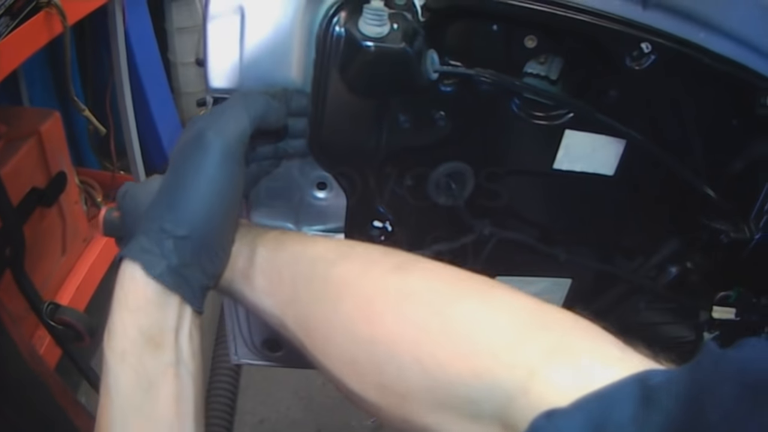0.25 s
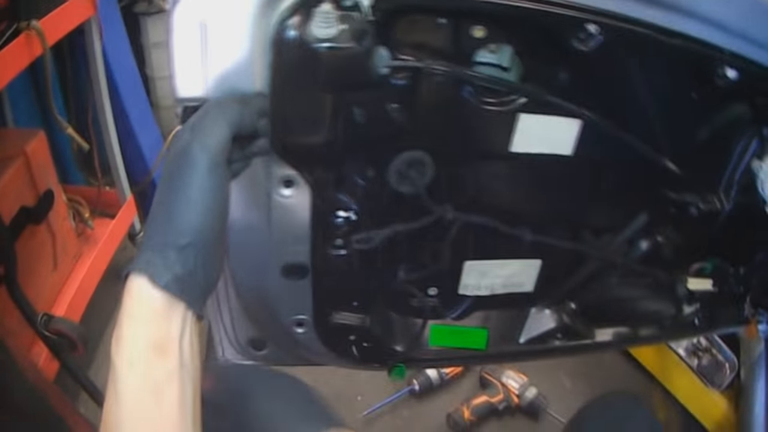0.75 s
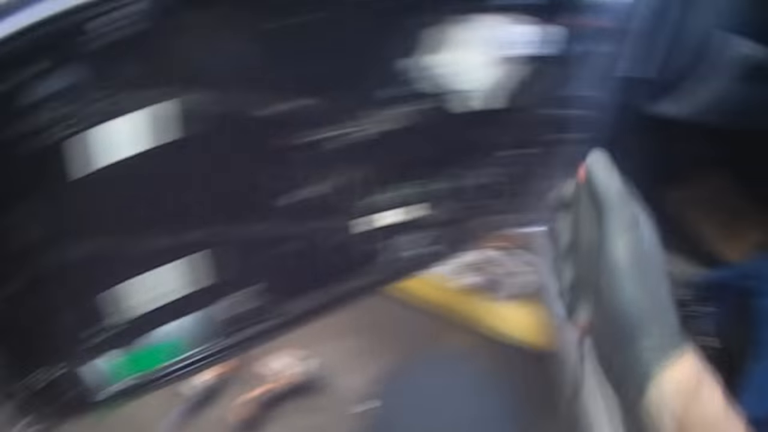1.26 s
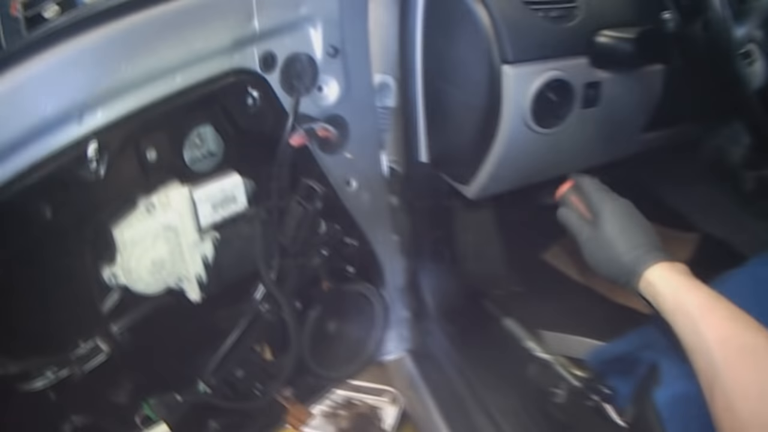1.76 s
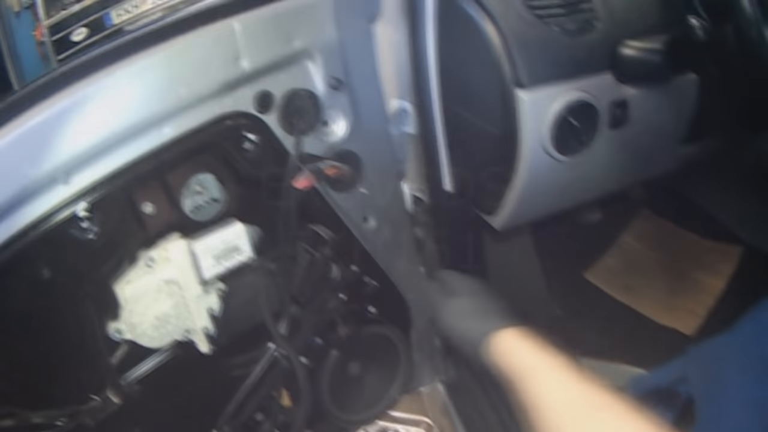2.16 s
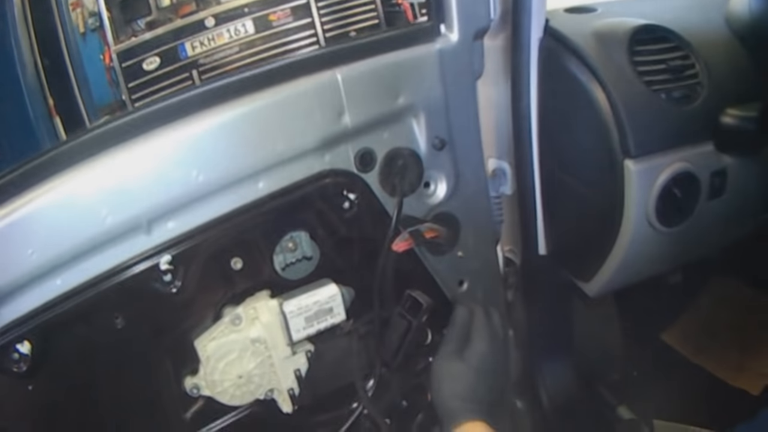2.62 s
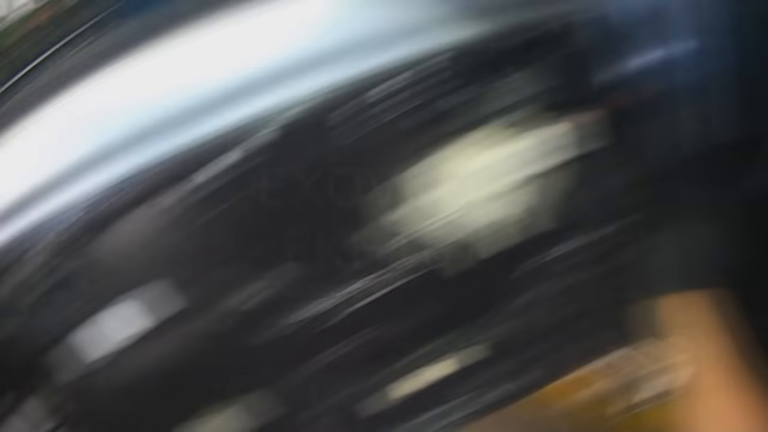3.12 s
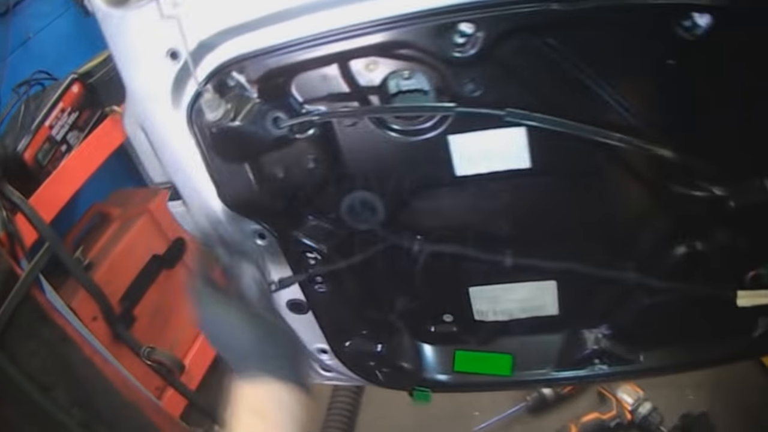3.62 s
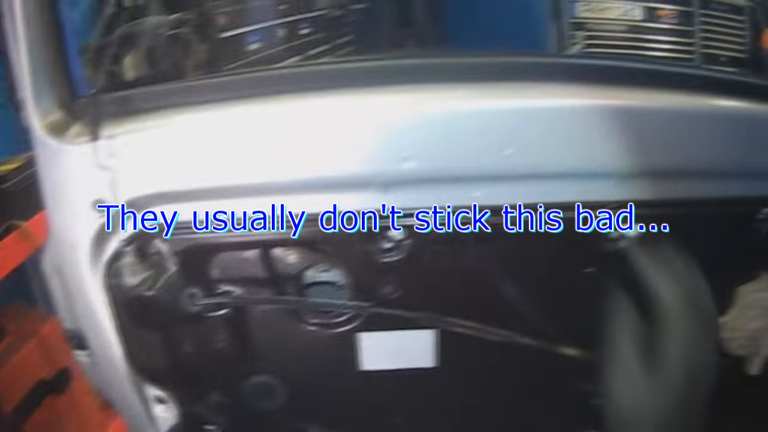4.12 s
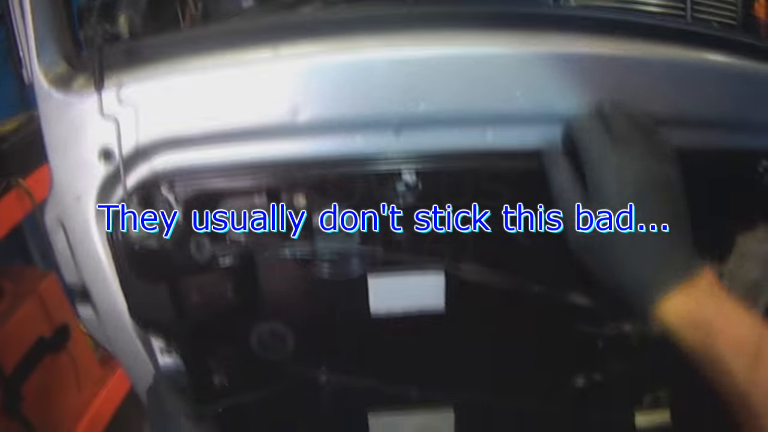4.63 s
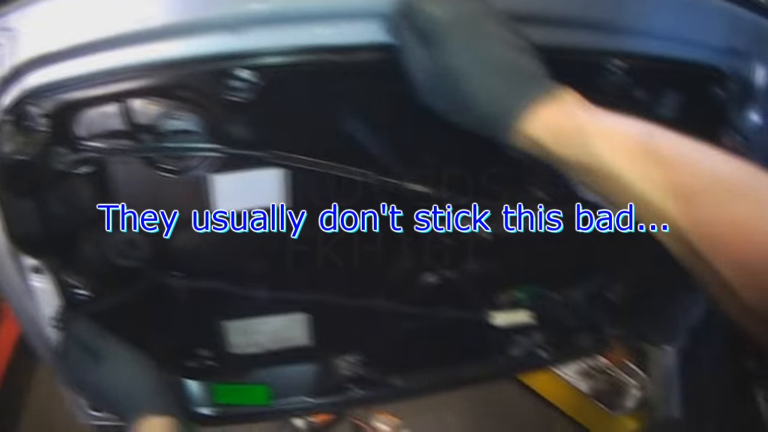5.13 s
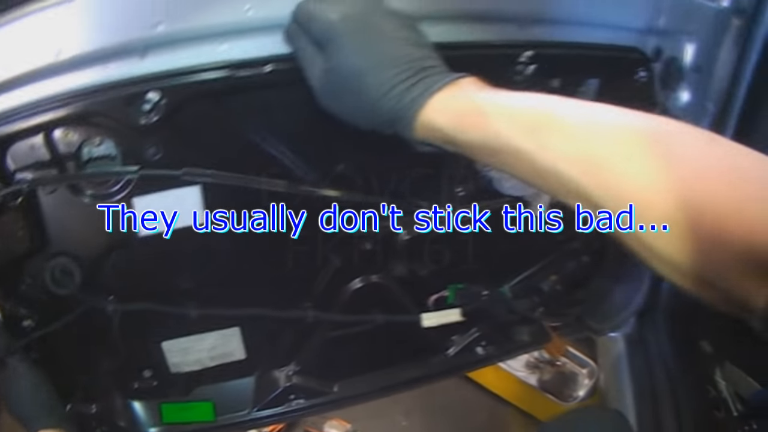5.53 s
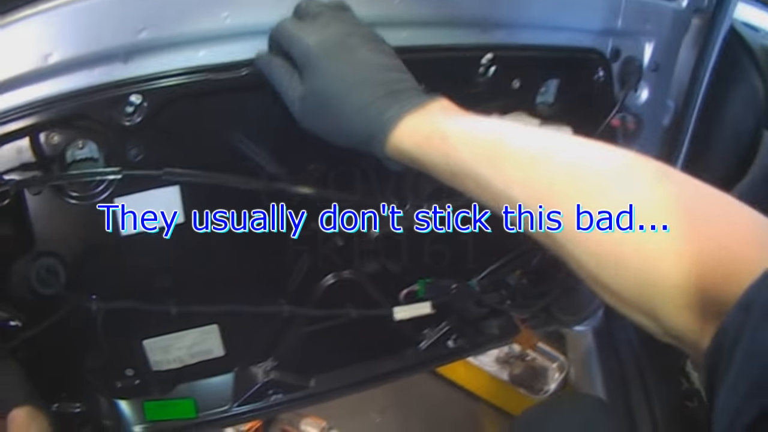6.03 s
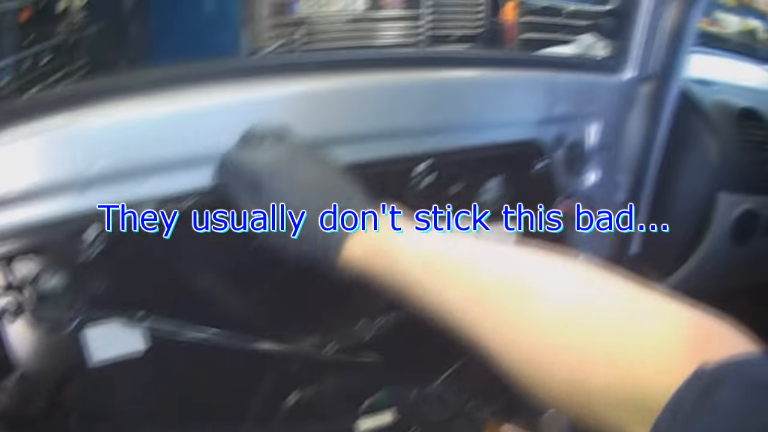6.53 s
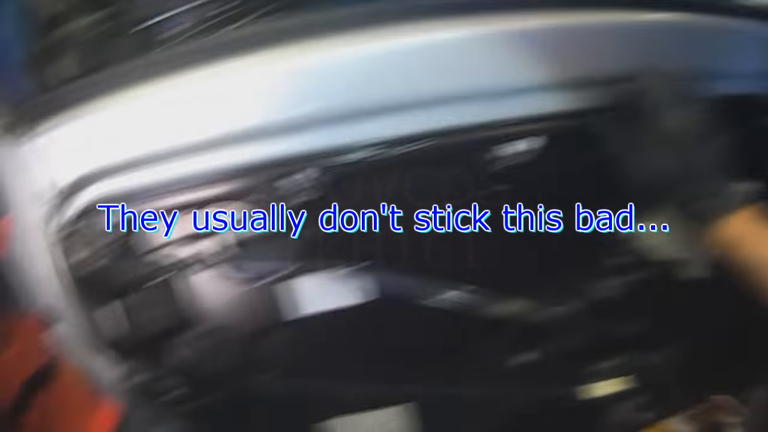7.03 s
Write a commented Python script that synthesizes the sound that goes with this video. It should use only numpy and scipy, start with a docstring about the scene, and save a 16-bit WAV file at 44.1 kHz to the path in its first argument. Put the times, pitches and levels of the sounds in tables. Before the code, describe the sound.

A quiet engine idle runs throughout: a wavering low hum with a fast throbbing roar, thin hiss, very faint whines and low camera rumble. A tiny tick opens; a soft dull panel knock falls at 0.55 s and a faint tick at 0.85. At 2.1 a barely audible glove rub leads to a sharp, loud fastener crack at 2.23 with a short low boom, then smaller knocks at 2.35 and a tiny high squeak at 2.42. A soft low thump comes at 3.67, light ticks around 3.8 and 4.17, glove strokes at 4.55-4.7. Two short mid-pitched squeaks sound at 5.12-5.2, a knock at 5.29. At 6.18 a brief squeak bursts into the loudest event: ripping sealant, crowded metallic blows and a deep boom, peaking near 6.24, with a second lesser surge at 6.29. Rattles at 6.4, a small metal clink at 6.48, a weak knock at 6.54 and a crisp tick at 6.76 follow; then only the idle until 7.27.

```python
"""Door panel worked off by hand

A stuck sheet-metal panel is worked off a car door, close to a head-worn camera in a workshop with an idling engine.
Damped sines ring the panel, fastener, small part and bracket; filtered noise gives their contacts and cracks.
The seal squeaks in short tones, then tears in surges of tiny cracks and blows that jolt the panel.
A glove rubs in strokes of noise; the engine is a wavering hum plus a throbbing roar; sparse echoes give the room.
"""
import sys
import numpy as np
from scipy import signal
from scipy.fft import rfft, irfft
from scipy.io import wavfile

SR = 44100
rng = np.random.default_rng(int(sys.argv[2]) if len(sys.argv) > 2 else 0)


def log_audio(samples):
    """Write samples as a 16-bit WAV file to the path given in sys.argv[1]."""
    # one column per channel
    frames = np.atleast_2d(samples).T
    # limit to full scale, then quantise
    limited = np.clip(frames, -1, 1)
    pcm = np.round(limited * 32767).astype(np.int16)
    wavfile.write(sys.argv[1], SR, pcm)


N = 320607


def amp(db):
    """Decibels to gain."""
    return 10 ** (np.asarray(db) / 20)


def evened(x):
    """Scales to an rms of 1."""
    return x / np.sqrt(np.mean(x ** 2) + 1e-20)


def read(points, hz):
    """Reads a spectrum or decay curve on a log-frequency axis."""
    point_hz, value = np.transpose(points)
    return np.interp(np.log(hz + 1), np.log(point_hz + 1), value)


def follow(curve):
    """Reads a time curve at every sample."""
    return np.interp(np.arange(N) / SR, *np.transpose(curve))


def add(mix, start_s, sound):
    """Mixes a sound in at start_s."""
    part = mix[max(round(start_s * SR), 0):][:len(sound)]
    part += sound[:len(part)]


def noise(points, size=N):
    """Noise of rms 1 with the given spectrum."""
    gain = amp(read(points, np.fft.rfftfreq(size, 1 / SR)))
    return evened(irfft(rfft(rng.standard_normal(size)) * gain, size))


def drift(hz):
    """Slow random motion of rms 1, no faster than about hz."""
    knots = rng.standard_normal(4096)
    return evened(np.interp(np.arange(N) / SR * 2 * hz, np.arange(len(knots)), knots))


def colour(x, points, size=4096):
    """Passes x through a causal (minimum-phase) filter of unit energy with the given spectrum."""
    log_gain = np.log(amp(read(points, abs(np.fft.fftfreq(size, 1 / SR)))))
    taps = np.fft.ifft(np.exp(np.conj(signal.hilbert(log_gain)))).real[:size // 2]
    return signal.oaconvolve(x, taps / np.linalg.norm(taps))[:len(x)]


def shelve(x, bass_db, treble_db, bass_hz=400, treble_hz=1900):
    """Lifts or lowers bass and treble with first-order causal filters."""
    x = x + (amp(bass_db) - 1) * signal.lfilter(*signal.butter(1, bass_hz, fs=SR), x)
    return x + (amp(treble_db) - 1) * signal.lfilter(*signal.butter(1, treble_hz, "high", fs=SR), x)


def ring(modes, t, rise_s):
    """Dying sines that build up as the flexing spreads through the part."""
    modal = sum(amp(db - 60 * t / t60_s) * np.sin(2 * np.pi * hz * t) for hz, db, t60_s in modes)
    return modal * (1 - np.exp(-t / rise_s))


IDLE_HZ = 26.56  # firings per second
# hum lines: multiple_of_idle, relative_db
HUM = [(3, -3.5), (4, -9.5), (6, -3), (8, -12.5), (9, -6.5), (10, -12.5), (11, -17), (12, -15), (14, -7),
       (16, -13.5), (19, -8), (23, -13), (25, -8)]
# the two clearest hum lines: multiple_of_idle, relative_db
CLEAR_HUM = [(7, -3.5), (21, -6)]
# gain of the clear lines as the head turns: time_s, relative_db
CLEAR_HUM_DB = [(0, 7.5), (0.9, 4.5), (1.5, 1), (3.1, -5.5), (3.7, 5.5), (4.9, 3), (5.7, -2.5), (7.27, 2.5)]
# roar spectrum: frequency_hz, relative_db_per_hz
ROAR = [(40, -3.5), (70, -3), (130, 1), (220, -2.5), (380, -2), (530, -0.5), (650, 0), (860, -5),
        (1180, -7.5), (1500, -17.5), (2000, -28), (3000, -64)]
# roar gain as the head turns: time_s, relative_db
ROAR_DB = [(0, -35), (0.6, -34.5), (2.9, -37.5), (4.4, -36), (6.1, -34), (7.27, -35.5)]


def hum_lines(lines, turns, waver):
    """Sums multiples of the firing rate, each wavering in level on its own."""
    total = 0
    for multiple, db in lines:
        line_gain = amp(db) * (1 + waver * drift(hz=2.5))
        total = total + line_gain * np.cos(2 * np.pi * (round(multiple) * turns + rng.random()))
    return total


def engine(hum_db=-41, roar_db=1.0, throb=0.32, waver=0.34):
    """A wavering hum on multiples of the firing rate, and a roar that throbs with each firing."""
    turns = np.cumsum(IDLE_HZ * (1 + 0.0022 * drift(hz=3))) / SR
    hum = hum_lines(HUM, turns, waver)
    clear = hum_lines(CLEAR_HUM, turns, waver) * amp(follow(CLEAR_HUM_DB))
    puffs = evened(1 + throb * np.exp(-(turns % 1) / 2.0)) * rng.standard_normal(N)
    roar = colour(puffs, ROAR) * amp(roar_db + follow(ROAR_DB) + 0.5 * drift(hz=6.5))
    return amp(hum_db) * (hum + clear) + roar


# hiss spectrum: frequency_hz, relative_db_per_hz
HISS = [(1000, 0), (1900, 2.5), (2400, 2), (3100, -1.5), (4100, -5.5), (4900, -12), (6100, -10),
        (7000, -16), (8000, -14.5), (9300, -20), (11000, -25), (12200, -40), (14300, -46), (15300, -45)]
# rumble spectrum: frequency_hz, relative_db_per_hz
RUMBLE = [(1, 14), (6, 14.5), (12, 11.5), (28, 3), (55, -4), (110, -18), (300, -62.5)]
# faint whines in the shop: pitch_hz, level_db
WHINES = [(3171, -71), (9561, -82)]


def air(hiss_db=-58, rumble_db=-30.0, flutter_db=2.0):
    """Steady hiss, thin whines fluttering in pitch and level, and the low rumble of the moving camera."""
    whines = 0
    for hz, db in WHINES:
        gain = amp(db + flutter_db * drift(hz=16))
        cycles = np.cumsum(hz * (1 + 0.007 * drift(hz=119))) / SR
        whines = whines + gain * np.sin(2 * np.pi * cycles)
    hiss = amp(hiss_db + 0.5 * drift(hz=8.8)) * noise(HISS)
    return hiss + whines + amp(rumble_db) * noise(RUMBLE)


# light ticks: start_s, level_db, treble_db, ring_db
TICKS = [(0.017, -40.5, -13.5, -9), (0.854, -47.5, 5.5, -16), (2.441, -48, -8, -9), (3.792, -41.5, -8, -6),
         (3.818, -46, -2, -6), (4.168, -45, 3, -9), (6.162, -49, -12, -12), (6.763, -30, 7, -9)]
# contact spectrum: frequency_hz, relative_db_per_hz
TICK_COLOUR = [(700, -2), (1700, 3.5), (2300, 6), (3400, 4.5), (4800, -7), (7000, -17), (9500, -19),
               (12500, -29), (15000, -41)]
# small loose part's modes: pitch_hz, relative_db, t60_s
PART = [(1950, -7, .08), (2400, 5.5, 0.07), (2890, -4, 0.058), (3090, -0.5, .09), (3470, -5, 0.068),
        (4050, -9, .09), (4890, -11, .08)]
TICK_T60_S, SETTLE_S, SETTLE_DB = 0.064, 0.022, -11


def ticks(direct_db=-1, rise_s=0.001, size=12288):
    """A brief contact chatter and a softer second touch; the first leaves the small part ringing."""
    chatter, body, t = np.zeros(N), np.zeros(N), np.arange(size) / SR
    touch = (1 - np.exp(-t / rise_s)) * amp(-60 * t / TICK_T60_S)
    for start_s, db, treble_db, ring_db in TICKS:
        add(body, start_s, amp(db + ring_db) * ring(PART, t, rise_s))
        for delay_s, touch_db in ((0, 0), (SETTLE_S, SETTLE_DB)):
            burst = rng.standard_normal(size) * touch * amp(db + touch_db)
            add(chatter, start_s + delay_s, shelve(burst, 0, treble_db, treble_hz=7000))
    return amp(direct_db) * colour(chatter, TICK_COLOUR) + body


# knocks on the panel, and a faint bright click just before the fastener lets go: start_s, level_db, bass_db,
# treble_db, rattle_t60_s
BLOWS = [(0.551, -33, 11.5, -4, 0.084), (2.2026, -33.5, -23, 14, 0.021), (2.2337, -22, -3, 1, 0.08),
         (2.349, -23.5, 3, -12, 0.027), (2.360, -23.5, -6, -2, 0.11), (5.2915, -24.5, 2.5, -17, 0.046),
         (5.329, -34, 7.5, -14, 0.017), (6.193, -13.5, -6, -12, .04), (6.199, -21, -7, -6, 0.033),
         (6.2135, -12, 4, -12, 0.032), (6.220, -12.5, 3, 2, .04), (6.2305, -13.5, 4, 3, 0.014),
         (6.236, -10, 1, 0, 0.028), (6.2445, -8, -4, -2, 0.091), (6.253, -13.5, -1, -8, 0.035),
         (6.288, -15, 2, -6, .02), (6.295, -21, -4, -4, .04), (6.305, -21.5, 6.5, -3, .04),
         (6.400, -23.5, 2.5, -2, .14), (6.4765, -33, -17, 16.5, 0.12), (6.543, -29, -18, -7, 0.07)]
RATTLE_GAP_S, RATTLE_JITTER = 0.005, 0.324  # jitter in gaps


def rattles(count=4):
    """Each knock and its dying, unevenly spaced touches: start_s, level_db, bass_db, treble_db."""
    touches = []
    for start_s, db, bass_db, treble_db, t60_s in BLOWS:
        jitter = RATTLE_JITTER * rng.uniform(-1.007, 1, count)
        times_s = RATTLE_GAP_S * (np.arange(count) + 1 + jitter)
        touches += [(start_s + t, db - 60 * t / t60_s, bass_db, treble_db) for t in [0, *times_s]]
    return touches


# sheet modes: pitch_hz, relative_db, t60_s
PANEL = [(214, -4.5, 0.042), (237, -10, 0.19), (308, -3.5, 0.084), (423, -2.5, 0.068), (526, -8, 0.096),
         (636, 2, 0.12), (740, -3.5, 0.11), (832, -9, 0.11), (970, -1.5, 0.025), (1002, 2, 0.046),
         (1157, -17, 0.084), (1358, -13, 0.087), (1602, -15.5, 0.12)]
# dense crunch of a blow: frequency_hz, relative_db_per_hz
CRUNCH = [(60, -33), (180, 2.5), (500, 2), (1100, -1.5), (1500, -10.5), (2000, -23), (3000, -22.5),
          (4200, -36), (6500, -43.5), (10000, -48), (15000, -66)]


def panel(crunch_t60_s=0.051, contact_t60_s=0.0083, modes_db=-8, crunch_db=-8, contact_db=1,
          spread_s=0.00093, spot_db=1.5, size=16384):
    """Each touch and slip rings the sheet in a spot-dependent mix, over a hard contact and a short crunch."""
    out, t = np.zeros(N), np.arange(size) / SR
    modes = np.array([ring([mode], t, spread_s) for mode in PANEL])
    contact = amp(crunch_db - 60 * t / crunch_t60_s) + amp(contact_db - 60 * t / contact_t60_s)
    for start_s, db, bass_db, treble_db in rattles() + slips():
        force = rng.choice([-1, 1], size) * contact
        body = amp(modes_db + spot_db * rng.standard_normal(len(modes))) @ modes
        add(out, start_s, amp(db) * shelve(body + colour(force, CRUNCH), bass_db, treble_db))
    return out


# glove sliding on paint: start_s, length_s, relative_db, treble_db
RUBS = [(2.089, 0.1, -62.5, 13), (4.554, 0.052, -44, -7), (4.593, 0.13, -42.5, -7.5)]
# friction spectrum: frequency_hz, relative_db_per_hz
RUB_COLOUR = [(500, -4), (1500, 12), (3000, 3.5), (5300, -4.5), (7000, -16), (11000, -20), (15000, -35)]


def glove(size=16384):
    """Soft strokes of friction noise, uneven in level."""
    out = np.zeros(N)
    for start_s, length_s, db, treble_db in RUBS:
        stroke = signal.windows.tukey(int(length_s * SR), 0.7)[:size]
        friction = shelve(noise(RUB_COLOUR, size), 0, treble_db)[:len(stroke)]
        add(out, start_s, amp(db) * friction * stroke)
    return out * amp(-4 + drift(hz=77.0))


# fastener lets go in two jerks: start_s, level_db
SNAPS = [(2.2307, -5.5), (2.2343, -20.5)]
# modes of the stiff spot round it: pitch_hz, relative_db, t60_s
FASTENER = [(708, 4.5, 0.046), (950, 3.5, 0.026), (1340, -16, 0.033), (1620, -6.5, 0.038),
            (2620, -14.5, 0.029), (3260, -24, 0.03), (5150, -20, 0.022)]
# crack spectrum: frequency_hz, relative_db_per_hz
CRACK = [(700, 9.5), (1700, 3.5), (3000, -3.5), (4300, -8), (5200, -15), (6500, -17.5), (9500, -24),
         (12500, -37), (15000, -38)]


def fastener(crack_db=-20, crack_t60_s=0.05, ring_wet_db=-27, crack_wet_db=-14.5,
             scatter_db=-28, scatter_t60_s=0.075, scatter_per_s=500):
    """Two jerks ring the stiff spot; a crack and scattered chatter start with the first; both echo."""
    body, crack, t = np.zeros(N), np.zeros(N), np.arange(SR // 4) / SR
    for start_s, db in SNAPS:
        add(body, start_s, -amp(db) * ring(FASTENER, t, rise_s=0.0019))
    burst = rng.standard_normal(len(t)) * amp(crack_db - 60 * t / crack_t60_s)
    clicks = rng.choice([-1, 1], len(t)) * (rng.random(len(t)) < scatter_per_s / SR)
    scatter = evened(clicks) * amp(scatter_db - 60 * t / scatter_t60_s)
    add(crack, SNAPS[0][0], colour(burst + scatter, CRACK))
    return body + crack + shop(amp(ring_wet_db) * body + amp(crack_wet_db) * crack)


# whole sheet springs back: start_s, level_db, pitch_hz, t60_s
BOOMS = [(2.231, -15, 110, 0.12), (3.674, -19.5, 105.7, 0.2), (6.212, -6, 99.8, 0.28)]


def booms(rise_s=0.02):
    """The lowest mode of the sheet swells over a few cycles while dying away."""
    out, t = np.zeros(N), np.arange(SR // 2) / SR
    for start_s, db, hz, t60_s in BOOMS:
        add(out, start_s, ring([(hz, db, t60_s)], t, rise_s))
    return out


# stick-slip of the seal: start_s, length_s, pitch_hz, level_db
SQUEAKS = [(2.422, 0.019, 1225, -27), (5.117, 0.033, 632, -24), (5.161, 0.043, 632, -24),
           (6.176, 0.0092, 1120, -22)]


def squeaks(overtone_db=-33):
    """The seal slips in short, near-pure tones."""
    out = np.zeros(N)
    for start_s, length_s, hz, db in SQUEAKS:
        phase = 2 * np.pi * hz * np.arange(int(length_s * SR)) / SR
        tone = np.sin(phase) + amp(overtone_db) * np.sin(2 * phase)
        add(out, start_s, amp(db) * signal.windows.tukey(len(phase), 0.5) * tone)
    return out


SWELL_POWER, RELEASE_T60_S = 0.34, 0.16


def pull(t, swell_s):
    """Force on the seal, 0-1, t seconds into a surge: grows as a power of time, then dies away."""
    release = amp(-60 * np.maximum(t - swell_s, 0) / RELEASE_T60_S)
    return np.clip(t / swell_s, 0, 1) ** SWELL_POWER * release


# surges of the tearing seal: start_s, swell_s, relative_db
TEARS = [(6.177, 0.066, -11), (6.2865, 0.0033, -15.5)]
SLIP_GAP_S, SLIP_JITTER = 0.0055, 0.353  # jitter in gaps
SLIP_DB, SLIP_BASS_DB, SLIP_TREBLE_DB = -6.5, 9, -8


def slips(count=32):
    """Seal slips jolt the panel, as hard as the pull: start_s, level_db, bass_db, treble_db."""
    blows = []
    for start_s, swell_s, db in TEARS:
        early = rng.uniform(-0.98, 1, count)
        times_s = SLIP_GAP_S * (np.arange(count) + 0.5 + SLIP_JITTER * early)
        levels_db = SLIP_DB + db + 20 * np.log10(pull(times_s, swell_s) + 1e-9)
        blows += [(start_s + t, level_db, SLIP_BASS_DB, SLIP_TREBLE_DB)
                  for t, level_db in zip(times_s, levels_db)]
    return blows


# sticky seal ripping: frequency_hz, relative_db_per_hz
RIP_COLOUR = [(500, 2), (1400, 8.5), (2100, 6), (3100, 4), (4200, -8), (7000, -19.5), (10000, -27),
              (15000, -41)]


def rip(per_s=1400, spread_db=1.5, rip_db=-10.5, steepness=1.86):
    """Strands of sealant part as a dense run of tiny cracks whose level follows a power of the pull."""
    sizes = amp(spread_db * np.minimum(rng.exponential(1, N), 3))
    cracks = (rng.random(N) < per_s / SR) * rng.choice([-1, 1], N) * sizes
    t = np.arange(N) / SR
    force = sum(amp(db) * pull(t - start_s, swell_s) for start_s, swell_s, db in TEARS)
    return amp(rip_db) * colour(evened(cracks) * force ** steepness, RIP_COLOUR)


# loose metal bracket's modes: pitch_hz, relative_db, t60_s
BRACKET = [(728, 2, .11), (1076, 0.5, 0.081), (1432, -9, 0.054), (2514, -21, .07), (2821, -24, 0.064),
           (6120, -24, .05), (6636, -30, .045), (7962, -32, .05)]
CLINK_S, CLINK_DB = 6.4765, -26.5


def bracket(rise_s=0.0007):
    """The bracket's damped modes clink once as the freed panel settles."""
    out = np.zeros(N)
    add(out, CLINK_S, amp(CLINK_DB) * ring(BRACKET, np.arange(SR // 4) / SR, rise_s))
    return out


# workshop reverberation: frequency_hz, t60_s
SHOP = [(100, 0.18), (600, 0.38), (2500, 0.21), (6000, 0.19), (14000, 0.14)]


def shop(x, bass_db=-3, treble_db=5, echoes_per_s=3000, first_echo_s=0.006):
    """Sparse reflections of random sign; each band dies at its own speed."""
    taps = rng.choice([-1., 1.], SR) * (rng.random(SR) < echoes_per_s / SR)
    taps = taps * (np.arange(SR) > first_echo_s * SR)
    hz, t, bands = signal.stft(taps, SR, nperseg=256)
    tail = signal.istft(bands * amp(-60 * t / read(SHOP, hz)[:, None]), SR, nperseg=256)[1]
    return signal.fftconvolve(x, shelve(tail / np.linalg.norm(tail), bass_db, treble_db))[:N]


# noise differing between the two microphone ports: frequency_hz, relative_db_per_hz
PORT_NOISE = [(20, -17), (100, -2), (650, -3), (1300, -11), (2400, -22), (5000, -26.5), (9500, -36.5),
              (15000, -45)]


def scene():
    """All sounds reach both ports alike; only faint noise differs between them."""
    metal = panel() + booms() + squeaks()
    small = ticks() + bracket() + rip() + glove()
    echoes = shop(amp(-19.5) * metal + amp(-13.5) * small)
    mid = metal + small + echoes + fastener() + engine() + air()
    side = amp(-53) * noise(PORT_NOISE)
    return np.array([mid + side, mid - side])


EDGE_HZ = 15350


def record(dry):
    """The camera rounds off the highest peaks, then limits the band."""
    rounded = dry / (1 + dry ** 8) ** (1 / 8)
    lowpass = signal.firwin(511, EDGE_HZ, window=("kaiser", 9), fs=SR)
    return signal.oaconvolve(rounded, lowpass[None], "same")


dry = scene()
out = record(dry)
log_audio(out)
```